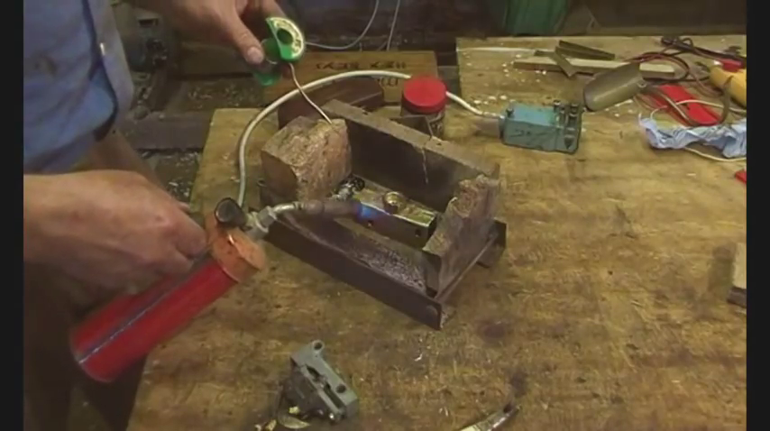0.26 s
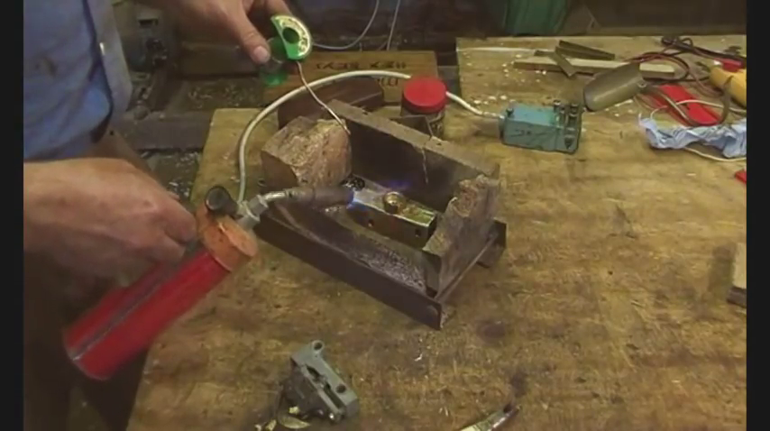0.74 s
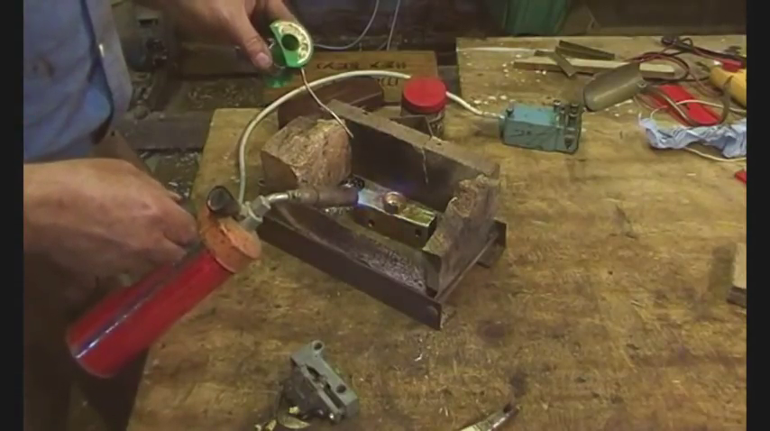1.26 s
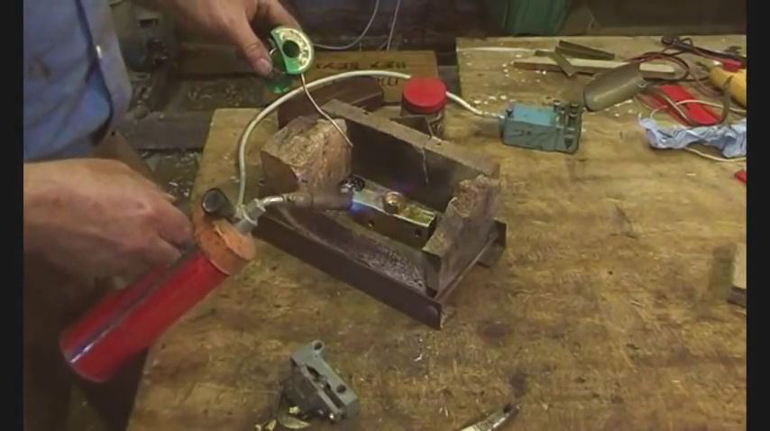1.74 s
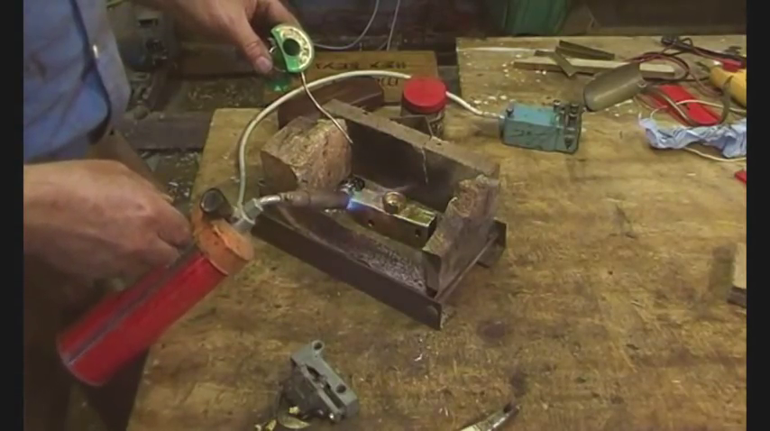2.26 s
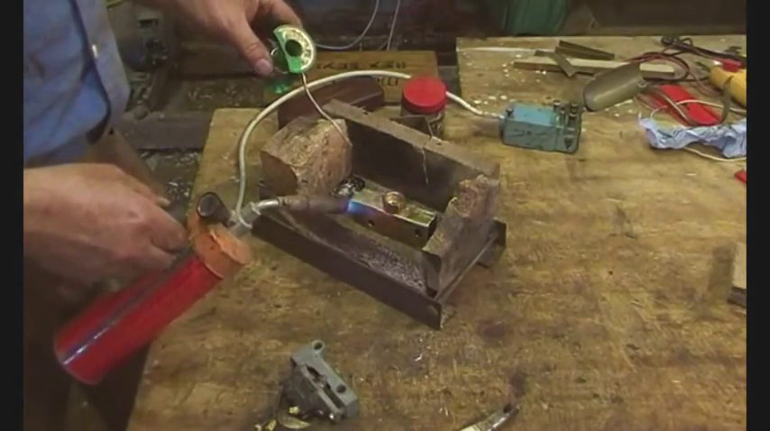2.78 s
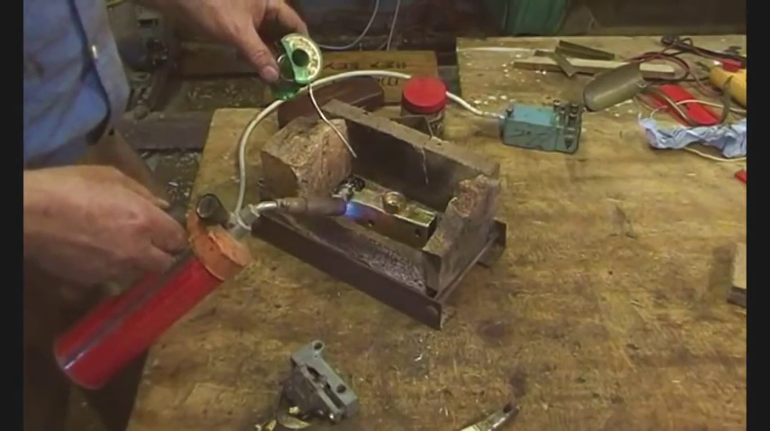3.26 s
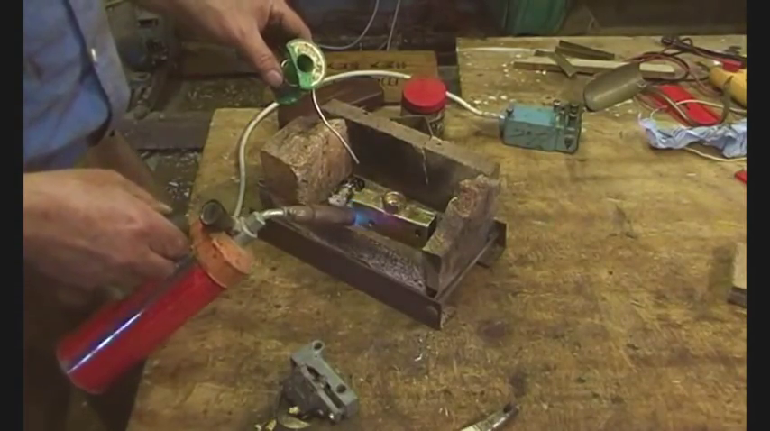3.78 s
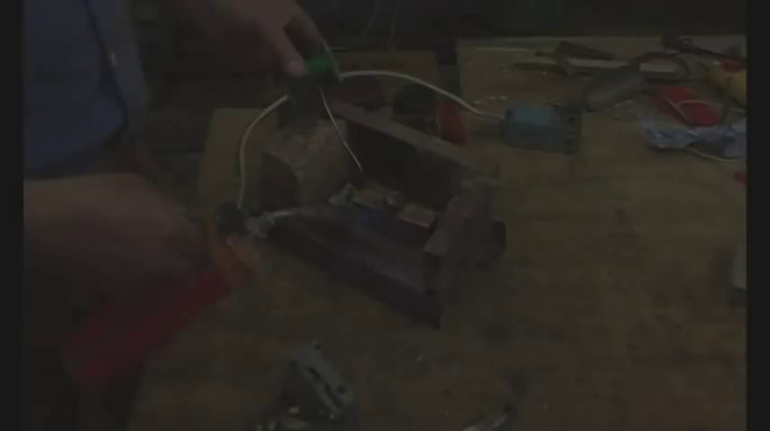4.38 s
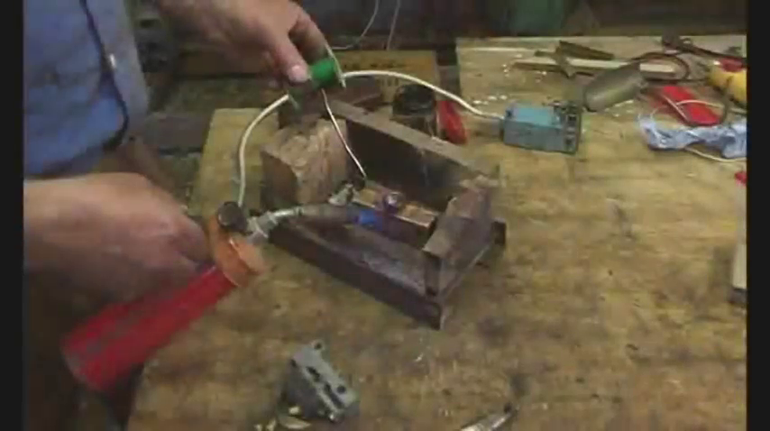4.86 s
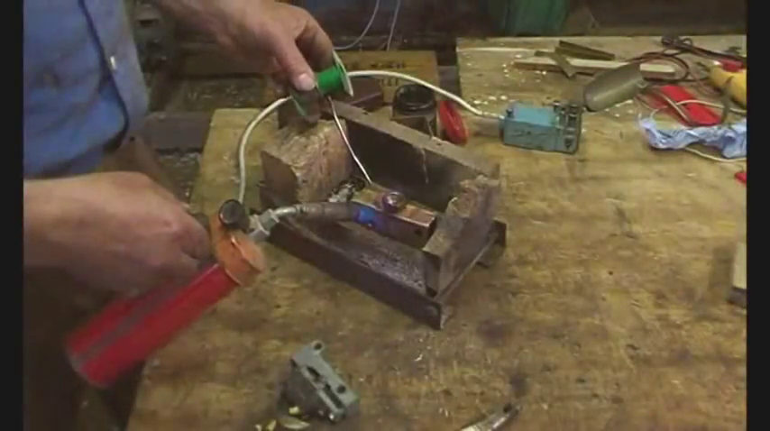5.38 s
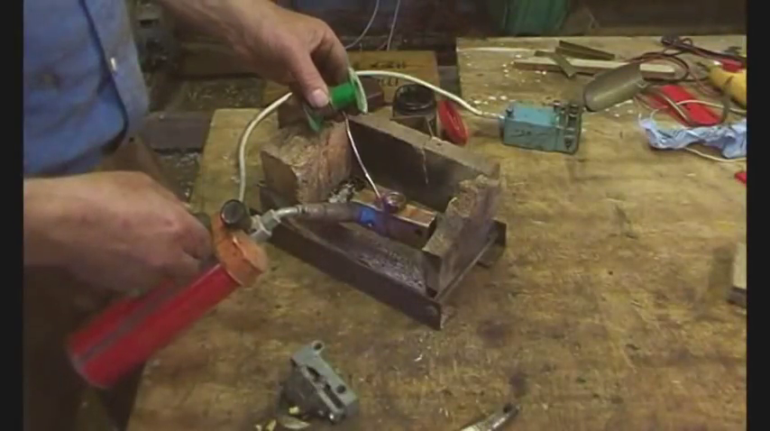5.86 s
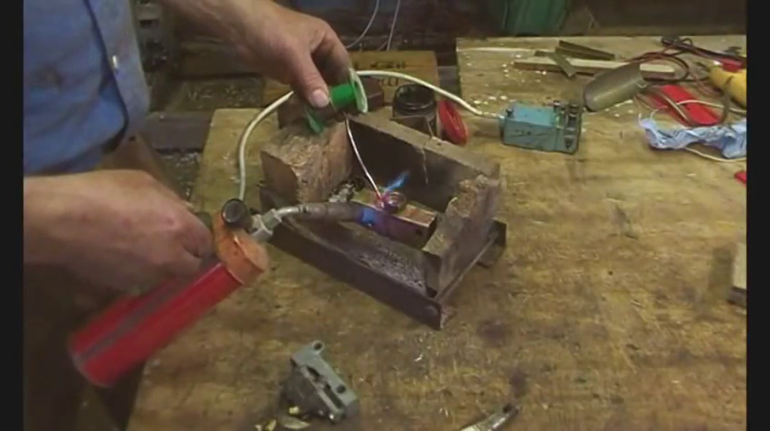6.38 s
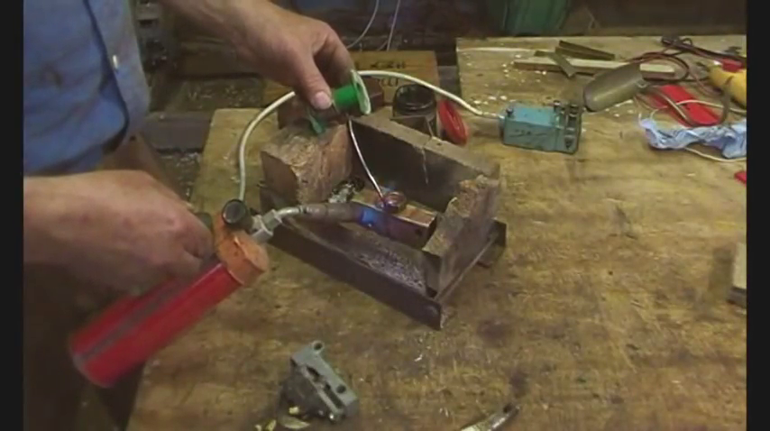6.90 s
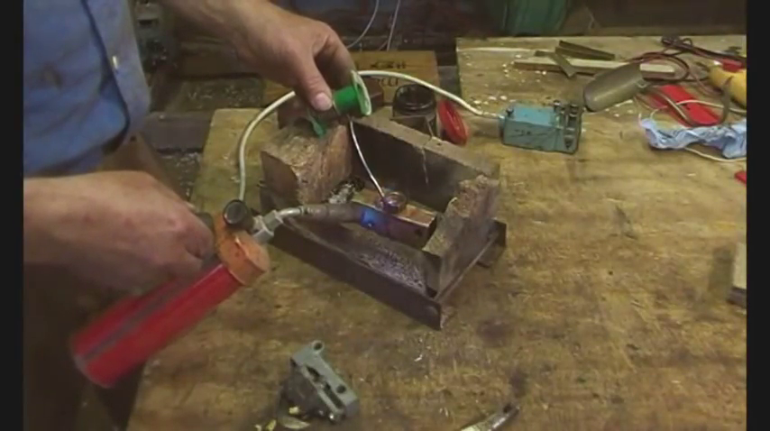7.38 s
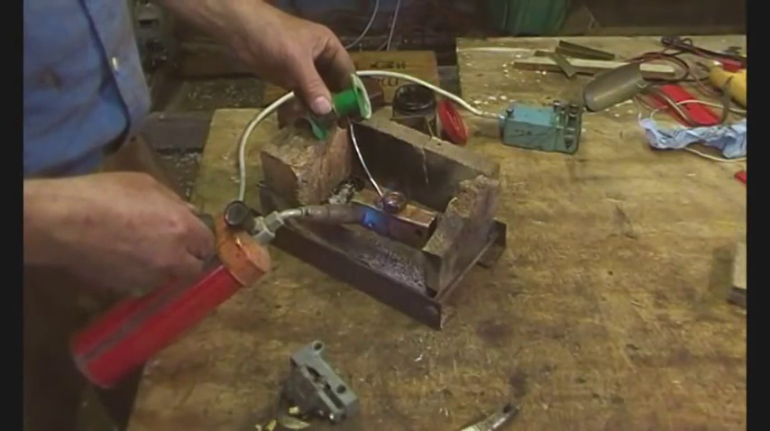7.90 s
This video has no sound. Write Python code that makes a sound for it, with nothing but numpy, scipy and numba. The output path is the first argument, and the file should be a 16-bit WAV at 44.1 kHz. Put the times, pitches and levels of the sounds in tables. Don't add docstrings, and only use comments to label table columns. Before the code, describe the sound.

A small gas torch roars and hisses steadily in a workshop, fluttering slightly, with one tiny abrupt dropout just past the middle.

```python
import sys
import numpy as np
from scipy import signal
from scipy.fft import rfft, irfft
from scipy.io import wavfile
from scipy.ndimage import uniform_filter1d
from numba import njit

SR = 44100
rng = np.random.default_rng(int(sys.argv[2]) if len(sys.argv) > 2 else 0)


def volts_from_decibels(level):
    exponent = np.asarray(level, float) / 20
    return 10 ** exponent


def transcribe(u):
    v = np.clip(np.atleast_2d(u).T, -1, 1)
    q = np.round(v * 32767).astype(np.int16)
    wavfile.write(sys.argv[1], SR, q)


N = 358974


@njit
def svf(x, hz, width):
    y, band, low = np.empty(len(x)), 0., 0.
    for i in range(len(x)):
        g, k = np.tan(np.pi * hz[i] / SR), width / hz[i]
        v = (band + g * (x[i] - low)) / (1 + g * (g + k))
        band, low, y[i] = 2 * v - band, low + 2 * g * v, k * v
    return y


def unit(x):
    return x / np.sqrt(np.mean(x ** 2))


def across(table, column=1):
    hz = np.maximum(np.fft.rfftfreq(N, 1 / SR), 1)
    rows = np.array(table)
    return np.interp(np.log(hz), np.log(rows[:, 0]), rows[:, column])


def along(table):
    s, *columns = np.array(table).T
    return [np.interp(np.arange(N) / SR, s, c) for c in columns]


def colour(x, gain):
    return irfft(rfft(x) * gain, N)


def ring(x, hz, width):
    return unit(svf(svf(x, hz, width), hz, width))


def walk(rate):
    hold = int(SR / rate)
    steps = np.repeat(rng.standard_normal(N // hold + 1), hold)
    return unit(uniform_filter1d(uniform_filter1d(steps, hold), hold)[:N])


def torch():
    narrow = hand()[-1]
    flicker = 0.5 * walk(4.1) + 0.76 * walk(18) + 1.7 * walk(220)
    direct = roar(flicker) + hearth(flicker) + nozzle(flicker) + hiss(flicker)
    ridge_hz = 9300 + 350 * walk(1.2)
    direct = direct + 0.35 * (walk(2) - narrow) * svf(direct, ridge_hz, 500.)
    return colour(bench(direct), shop()), scatter(flicker)


def hand():
    # (time [s], flame level [dB], reach into the hearth [0-1], hearth ring [Hz],
    # tilt of the jet to the bench [0-1])
    moves = [(0.0, -26, 0.8, 2720, 1), (0.4, -27, 0.57, 2610, 1), (0.75, -26.5, 0.62, 2650, .8),
             (1.05, -28, 0.06, 2590, .2), (1.35, -27.5, 0.14, 2550, 1), (1.7, -28, 0.2, 2530, .9),
             (2.1, -28, 0.1, 2610, 0.3), (2.45, -27.5, 0.14, 2630, 0.7), (2.85, -27.5, 0.7, 2540, 0.3),
             (3.5, -27, 0.53, 2600, 0.4), (3.85, -27.5, 0.76, 2610, .1), (4.2, -28.5, 0.83, 2430, 0.4),
             (4.36, -27, 0.84, 2500, .4), (4.40, -28, 0.4, 2814, .95), (5.2, -28, 0.7, 2830, .7),
             (6.15, -28, 0.5, 2835, 0.4), (7.05, -28, 0.38, 2840, 0.1), (8.14, -28.7, .4, 2860, 0.3)]
    flame_db, reach, hearth_hz, tilt = along(moves)
    rest_hz, narrow_hz = 2550, 290
    return flame_db, reach, hearth_hz, tilt, (hearth_hz - rest_hz) / narrow_hz


def eddies(flicker_db, own_db):
    return rng.standard_normal(N) * volts_from_decibels(flicker_db + own_db * walk(11))


def roar(flicker):
    # (frequency [Hz], density [dB per Hz])
    roar_spectrum = [(12, -67), (20, -42), (108, -18), (129, -12), (225, -5), (292, -3), (370, -6.5),
                     (409, -3.5), (551, -7), (685, -5), (979, -8.5), (1290, -18), (1850, -14.5),
                     (2170, -18.5), (2300, -19), (2990, -17), (5060, -120)]
    flame_db = hand()[0]
    burning = unit(colour(eddies(0.41 * flicker, 0.16), volts_from_decibels(across(roar_spectrum))))
    return hollow(burning) * volts_from_decibels(flame_db + 0.69)


def hollow(x):
    narrow = hand()[-1]
    x = x - 0.43 * svf(x, 1318 + 150 * narrow, 340.0)
    x = x + 0.45 * narrow * svf(x, np.full(N, 1200.), 133.0)
    return x + 0.46 * svf(x, 1720 + 220 * narrow, 244.0)


def hearth(flicker):
    _, reach, hearth_hz, _, narrow = hand()
    hearth_db = -38.15 + 8 * reach
    upper_db = -0.5 - 6 * reach + 2.5 * narrow
    lower = ring(eddies(0.36 * flicker, 0.89), hearth_hz, 570.0)
    upper = ring(eddies(0.12 * flicker, 0.28), np.full(N, 3380.), 565.0)
    return unit(lower + volts_from_decibels(upper_db) * upper) * volts_from_decibels(hearth_db)


def nozzle_level():
    _, reach, _, _, narrow = hand()
    return -42.4 + 4 * reach - 6 * np.maximum(narrow, 0) ** 2


def nozzle(flicker):
    nozzle_hz = 4307 + 327 * hand()[-1]
    return ring(eddies(1.16 * flicker, 0.84), nozzle_hz, 800.0) * volts_from_decibels(nozzle_level())


def hiss(flicker):
    # (frequency [Hz], density [dB per Hz])
    hiss_spectrum = [(2940, -33), (5000, 1.5), (6020, -45), (6750, -15), (7340, -9), (7850, -2),
                     (10100, -2), (12100, -14), (13500, -17.5), (14400, -21)]
    flame_db = hand()[0]
    hiss_db = -47.5 + 0.22 * (flame_db - flame_db.mean())
    return unit(colour(eddies(0.58 * flicker, 0.75), volts_from_decibels(across(hiss_spectrum)))) * volts_from_decibels(hiss_db)


def bench(x):
    _, reach, _, tilt, narrow = hand()
    x = x - 0.54 * reach * svf(x, 8520 + 905 * narrow, 780.0)
    x = x - tilt * svf(x, 11050 + 950 * np.maximum(tilt, narrow), 1300.)
    lift = 0.49 - 0.42 * narrow + 0.34 * tilt
    return x + lift * svf(x, np.full(N, 7400.), 710.0)


def scatter(flicker):
    # (frequency [Hz], density [dB per Hz])
    scatter_spectrum = [(12, -48), (20, -18), (107, -5.5), (225, -3), (370, -3.5), (402, -1), (529, -4.5),
                        (822, -5.5), (1460, -8), (3840, -4.5), (4530, -6), (6840, -20.5), (9520, -10.5),
                        (13200, -27.5), (14400, -27)]
    nozzle_db = nozzle_level()
    scattered = unit(colour(eddies(0.28 * flicker, 0.66), volts_from_decibels(across(scatter_spectrum))))
    return bench(scattered) * volts_from_decibels(-45.5 + 0.17 * (nozzle_db - nozzle_db.mean()))


def shop():
    # (frequency [Hz], width [Hz], level [dB])
    standing_waves = [(122, 18, -9), (153, 12, -4), (247, 10, -4), (378, 24, -9), (405, 10, 9.5),
                      (460, 16, 5.5), (487, 14, 3), (507, 12, -4), (530, 10, -3), (562, 20, -7),
                      (618, 10, -4), (690, 30, 2), (722, 10, -3), (782, 16, -4), (912, 22, -10),
                      (955, 40, 2), (1022, 14, -7), (1048, 18, 3), (1074, 16, -8), (1128, 16, -8),
                      (1188, 16, -7), (1225, 40, 2), (1267, 20, -4), (1312, 12, -3), (1342, 18, 4),
                      (1357, 10, -4), (1542, 14, -6), (2010, 16, -6), (2170, 120, -4), (3640, 160, -4)]
    hz = np.fft.rfftfreq(N, 1 / SR)
    waves_db = sum(db / (1 + (2 * (hz - f) / width) ** 2) for f, width, db in standing_waves)
    t60_s, tail_db = 0.3, -10
    t = np.arange(SR // 2) / SR
    tail = rng.standard_normal(SR // 2) * volts_from_decibels(-60 * t / t60_s)
    tail_spectrum = rfft(tail, N) / np.sqrt(np.sum(tail ** 2))
    crowded = np.clip((hz - 1350) / 200, 0, 1) * np.clip((5200 - hz) / 2500, 0, 1)
    return volts_from_decibels(waves_db) * (1 + crowded * volts_from_decibels(tail_db) * tail_spectrum)


def scene():
    direct, scattered = torch()
    return np.array([direct + scattered, direct - scattered])


def starve(x, bins=7):
    # (frequency [Hz], line of mid [spreads], line of side [spreads]); 0 = out half the time
    starving = [(700, -6, -3), (1100, -6, -.8), (2600, -6, -.9), (3300, -6, -2.5), (5400, -3, -3),
                (5950, .4, .2), (6350, 0, .2), (6800, 1.7, 1.7), (7250, -.5, 0), (7800, -3.5, -2.2),
                (10200, -3.5, -3), (11300, -.6, -.6), (12100, -.1, -.2), (13200, -.3, -.3), (14000, .7, .8)]
    pair = np.array([x[0] + x[1], x[0] - x[1]]) / 2
    hz, s, spec = signal.stft(pair, SR, nperseg=2048, noverlap=1536)
    blocks = np.arange(len(hz)) // bins
    chance = rng.standard_normal((3, blocks[-1] + 1, len(s)))
    lasting = unit(uniform_filter1d(uniform_filter1d(chance[0], size=16), size=2, axis=0))
    brief = unit(uniform_filter1d(uniform_filter1d(chance[1], size=3), size=5, axis=0))
    own = unit(uniform_filter1d(chance[2], size=4))
    treble = hz[::bins, None] > 4000
    luck = np.where(treble, .8 * lasting + .6 * own, brief)[blocks]
    power = uniform_filter1d(uniform_filter1d(abs(spec) ** 2 + 1e-16, size=9), size=bins, axis=1)
    sunk_db = 10 * np.log10(power / power.mean(2, keepdims=True))
    sunk_db -= np.median(sunk_db, axis=1, keepdims=True)
    rows = np.array(starving).T
    line = np.array([np.interp(hz, rows[0], r) for r in rows[1:]])[:, :, None]
    kept = luck + .3 * sunk_db > line
    mid, side = signal.istft(spec * kept, SR, nperseg=2048, noverlap=1536)[1][:, :N]
    return np.array([mid + side, mid - side])


def splice():
    t = np.arange(N) / SR
    cut_s, faint_end_s, back_s, fade_s = 4.3523, 4.39, 4.4085, 0.0074
    faint_db = -32 - 600 * np.maximum(t - cut_s, 0)
    faint = volts_from_decibels(faint_db) * np.clip((faint_end_s - t) / 0.0091, 0, 1)
    return np.where(t < cut_s, 1, faint + np.clip((t - back_s) / fade_s, 0, 1))


def roll_off(x):
    return signal.sosfilt(signal.butter(12, 14300, fs=SR, output="sos"), x)


def record(dry):
    # (frequency [Hz], left minus right [dB], left leads [radians])
    mismatch = [(30, 2, -0.15), (200, -1, -0.15), (1000, -0.8, -0.055), (2000, 0, 0.24),
                (3200, -1.5, -0.11), (3900, -2, 0.34), (4770, -4.5, 1.04), (5340, -6.5, 1.7),
                (6530, 15, 0.61), (7600, -0.5, 0.91), (9200, -1.5, -0.29), (10900, -1, 1.33),
                (12400, -5, -0.69), (13900, 1, 0)]
    half = volts_from_decibels(across(mismatch) / 2) * np.exp(.5j * across(mismatch, column=2))
    ports = colour(dry, np.array([half, 1 / half]))
    mix = starve(ports) * splice()
    return roll_off(mix)


dry = scene()
out = record(dry)
transcribe(out)
```